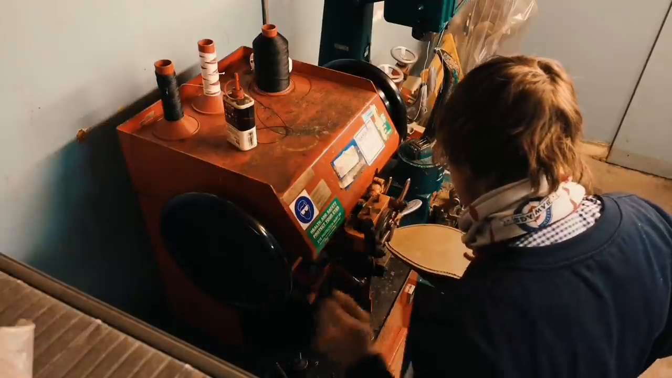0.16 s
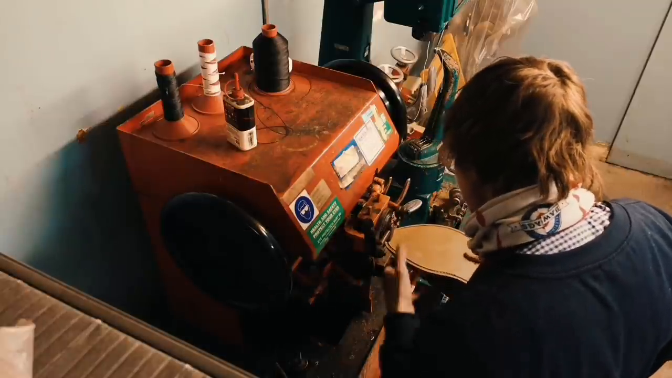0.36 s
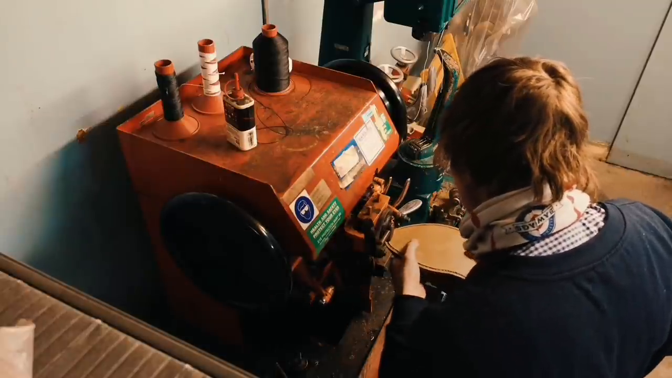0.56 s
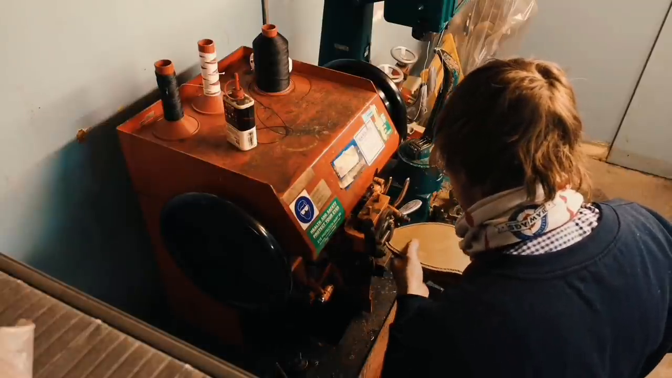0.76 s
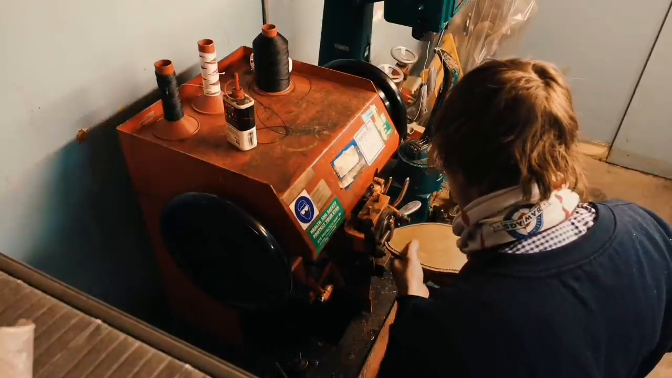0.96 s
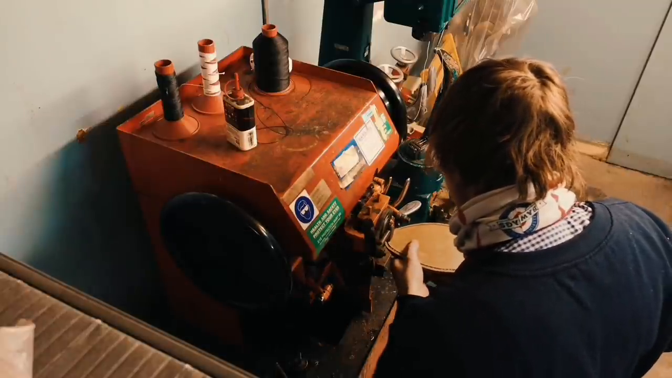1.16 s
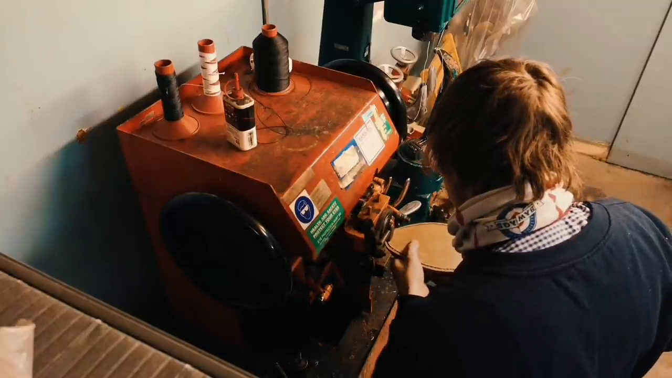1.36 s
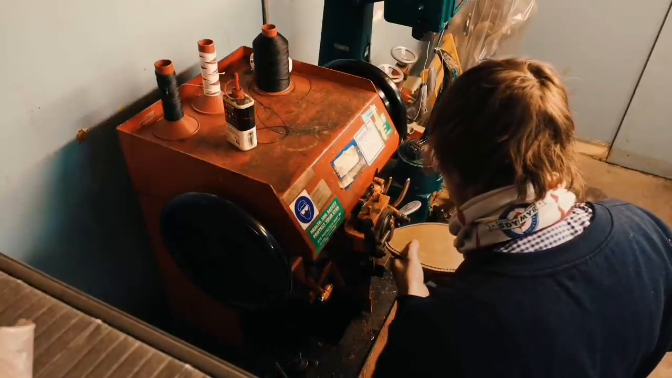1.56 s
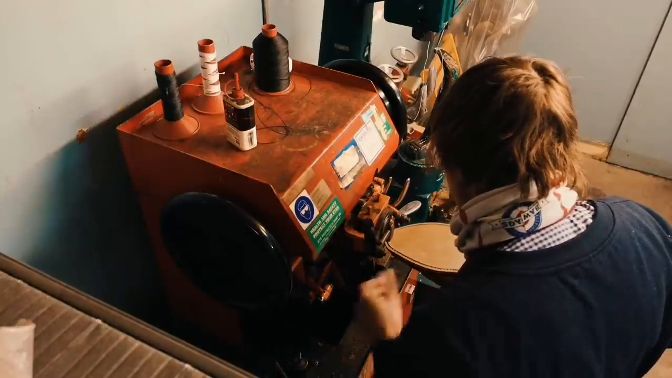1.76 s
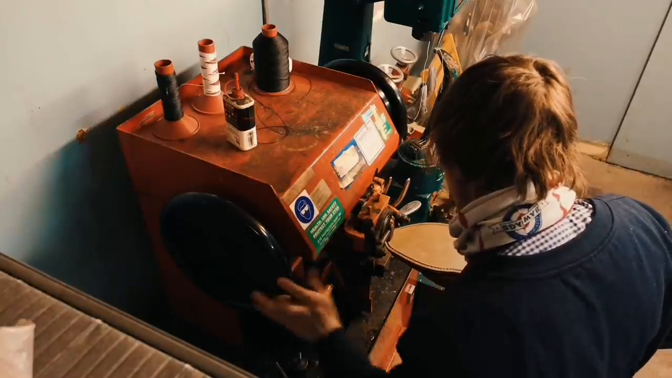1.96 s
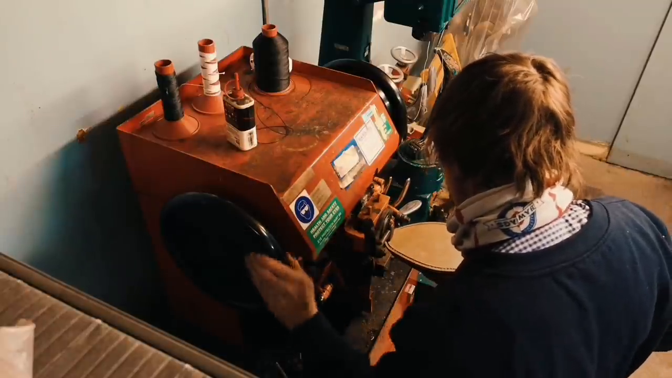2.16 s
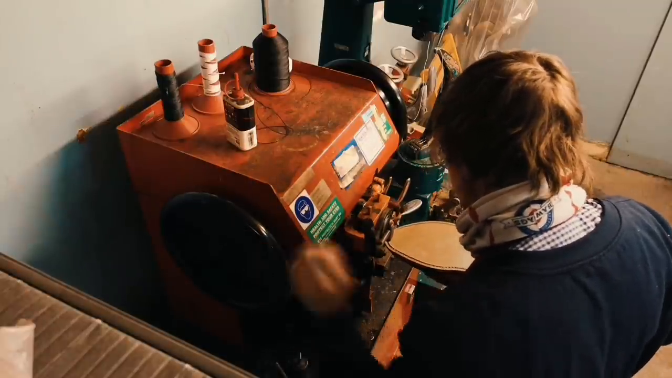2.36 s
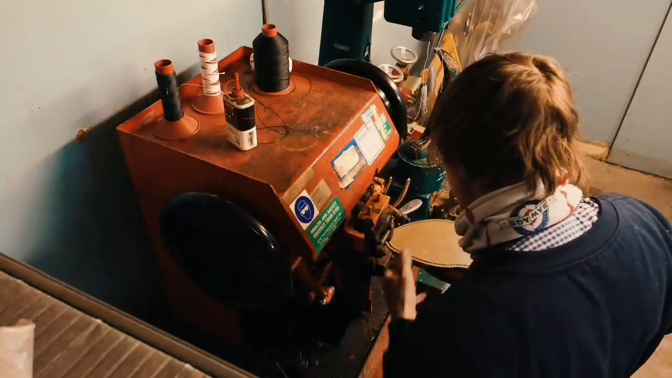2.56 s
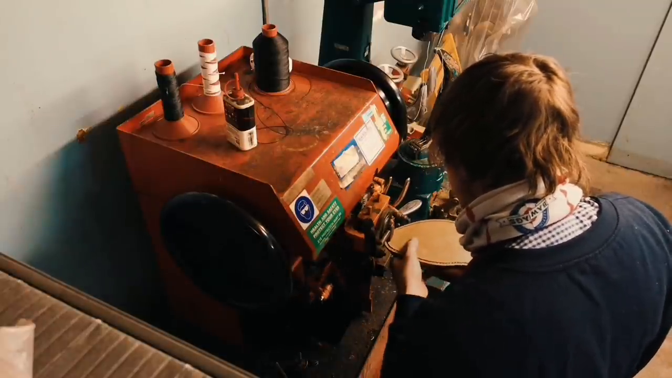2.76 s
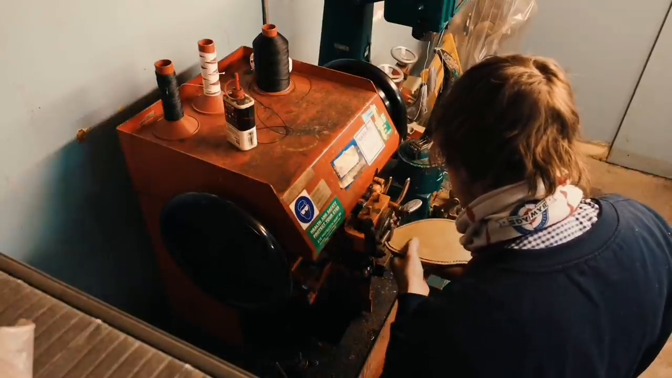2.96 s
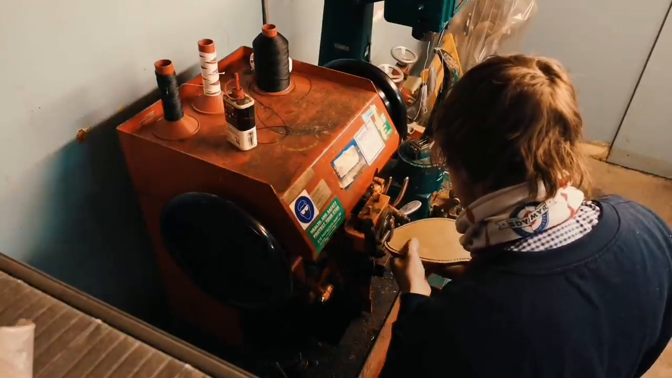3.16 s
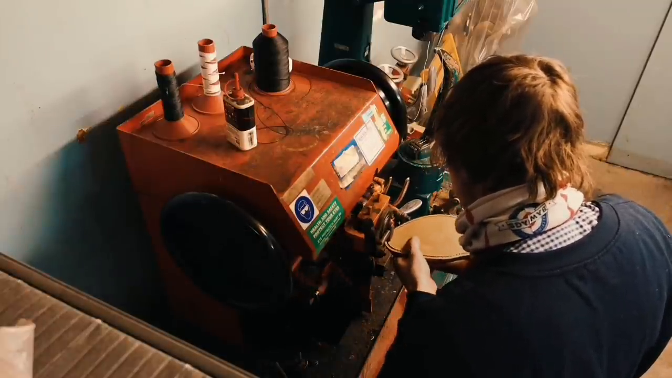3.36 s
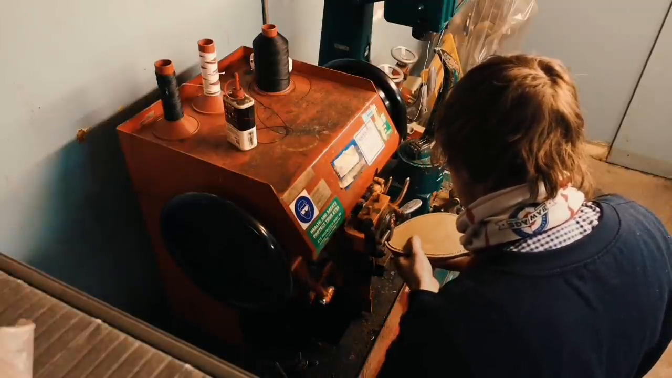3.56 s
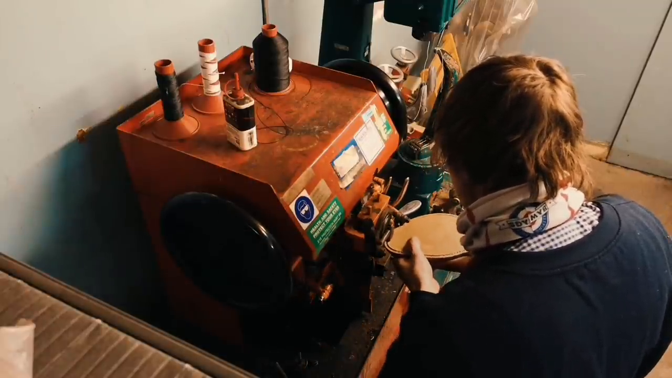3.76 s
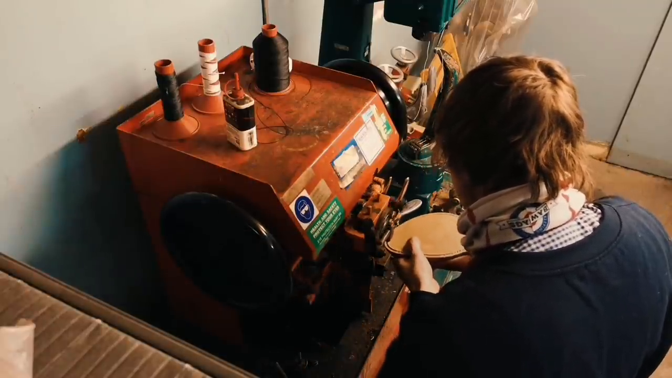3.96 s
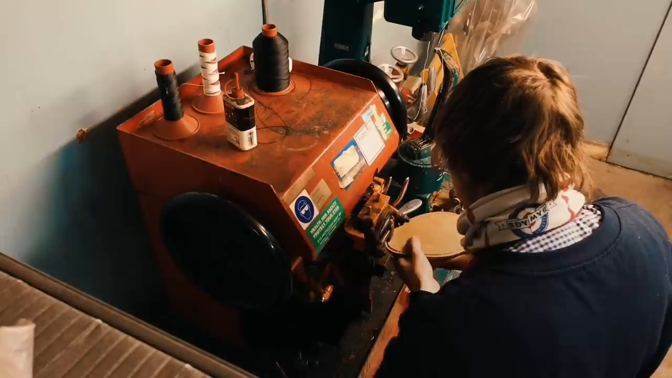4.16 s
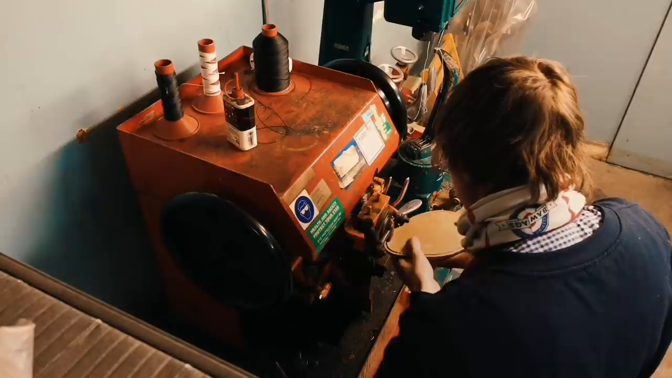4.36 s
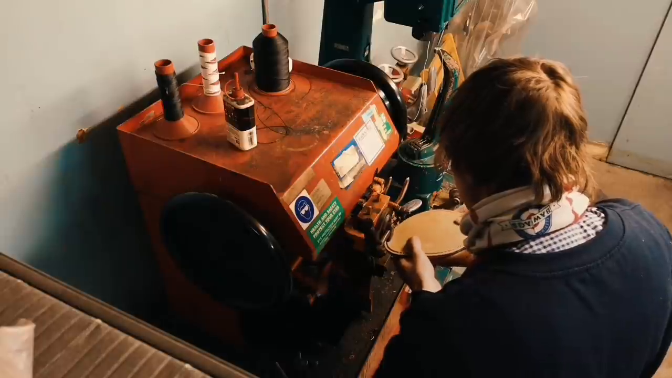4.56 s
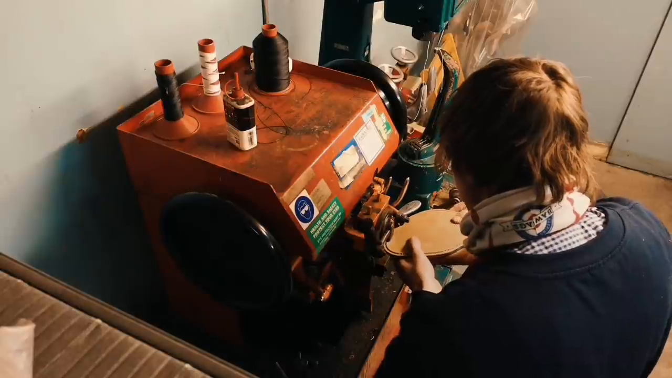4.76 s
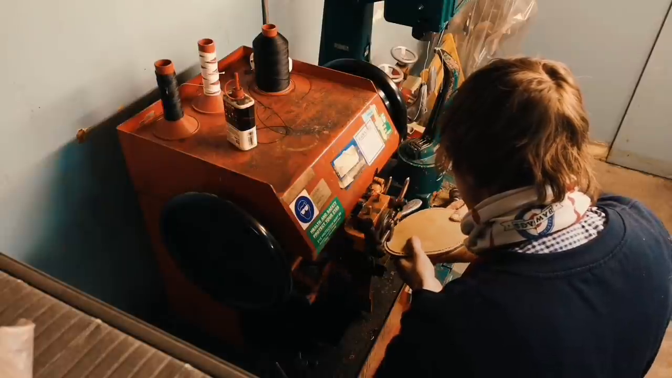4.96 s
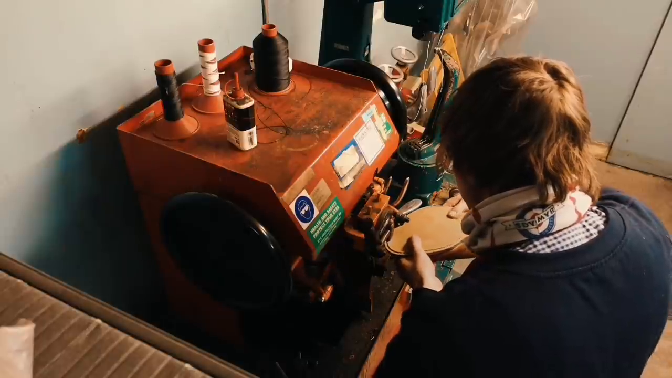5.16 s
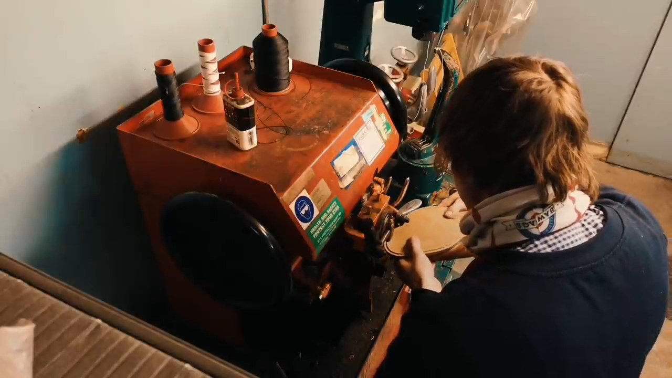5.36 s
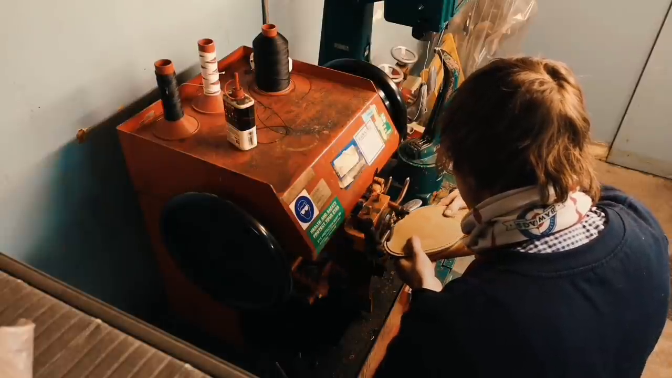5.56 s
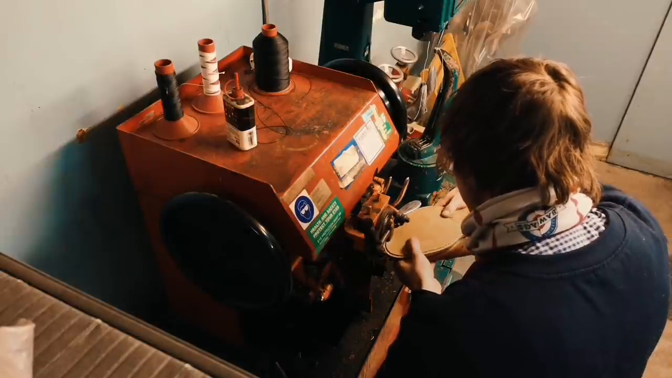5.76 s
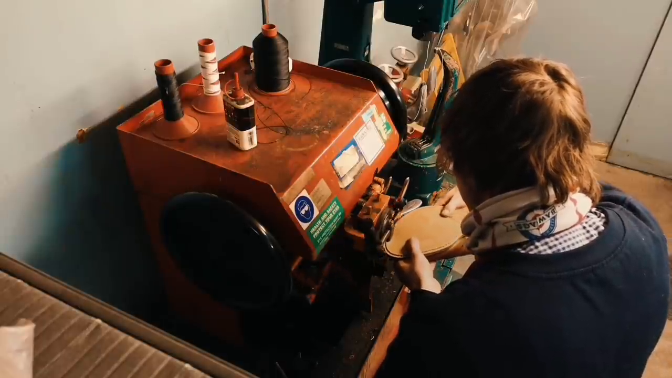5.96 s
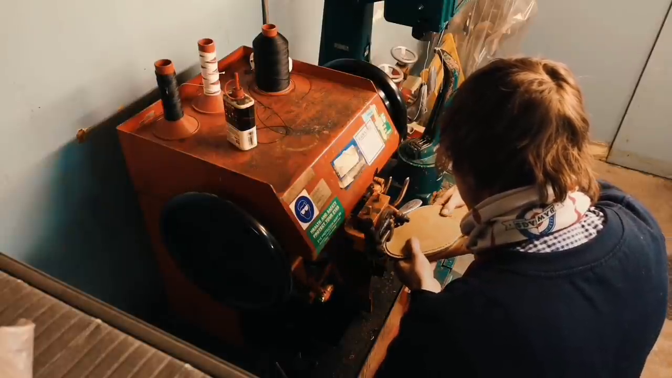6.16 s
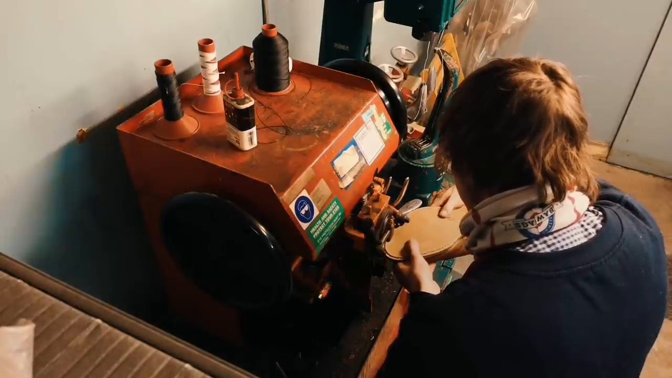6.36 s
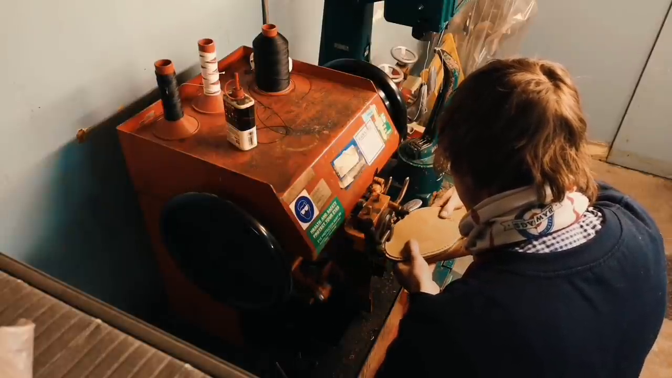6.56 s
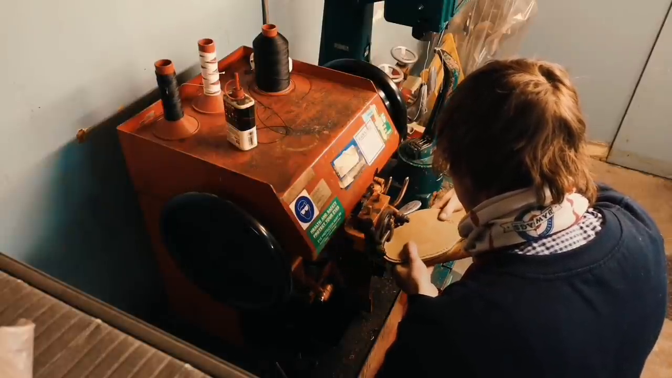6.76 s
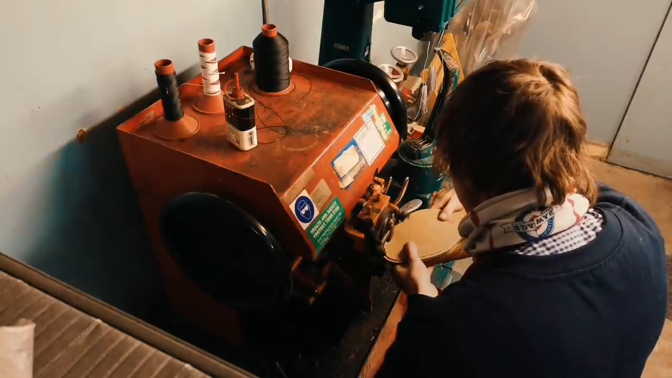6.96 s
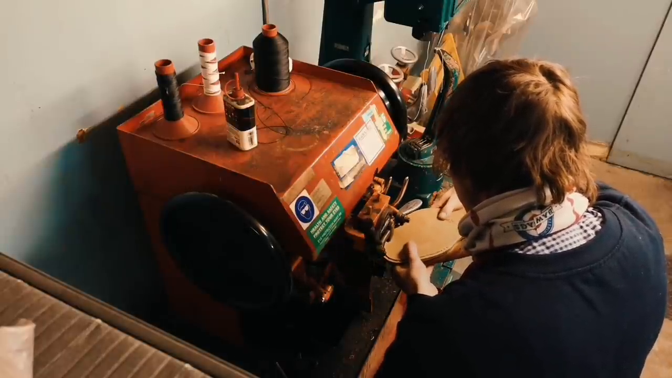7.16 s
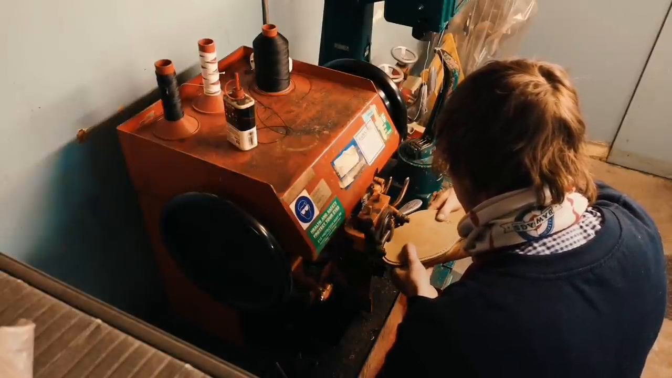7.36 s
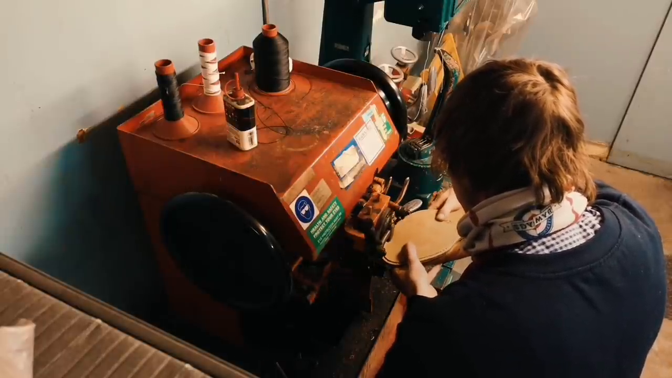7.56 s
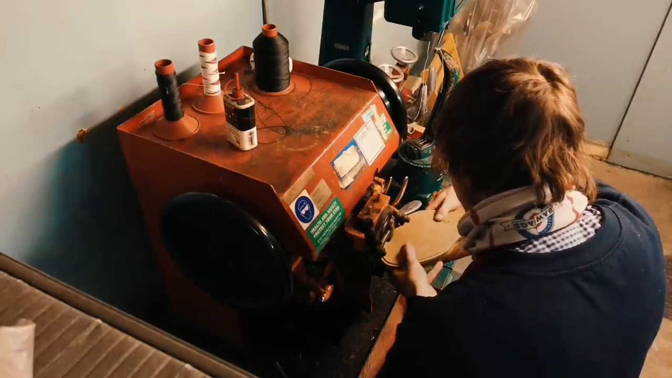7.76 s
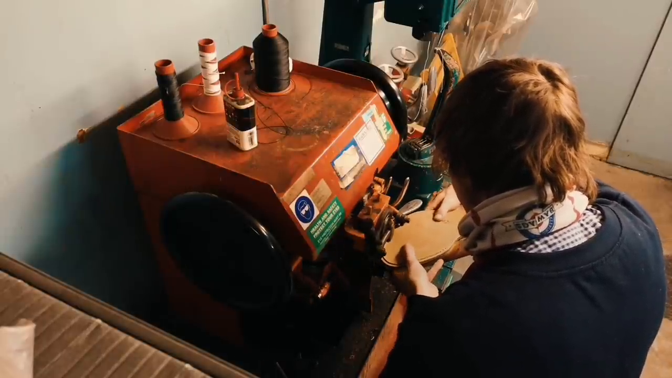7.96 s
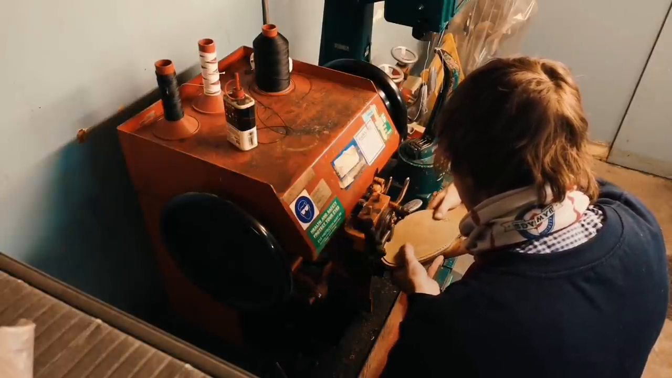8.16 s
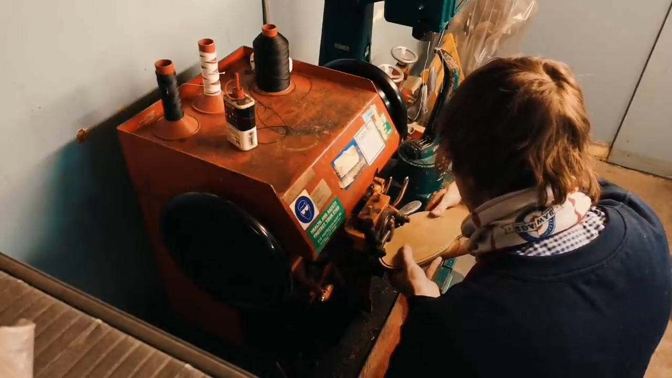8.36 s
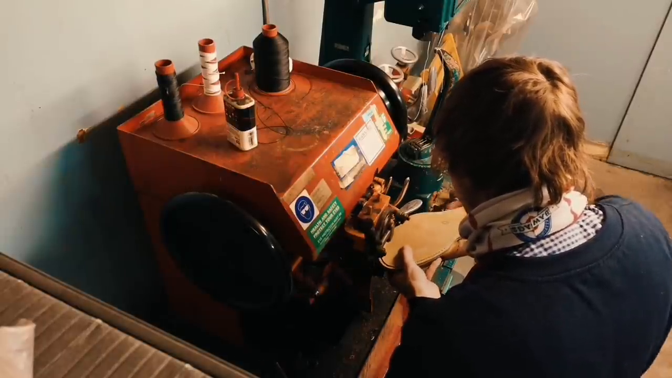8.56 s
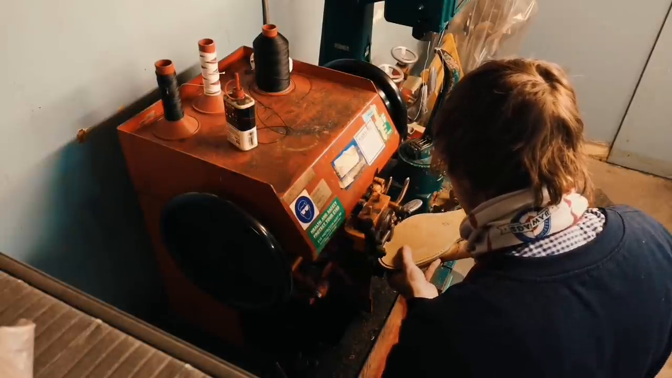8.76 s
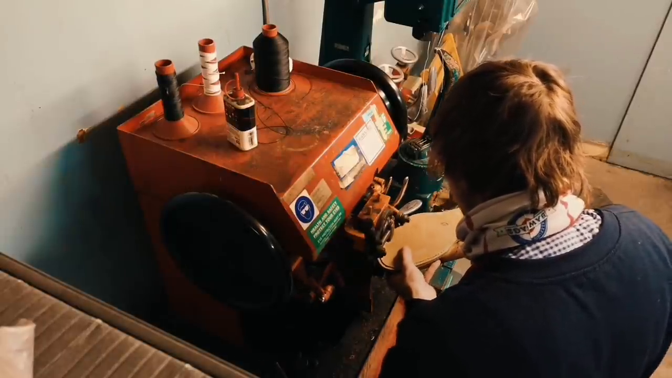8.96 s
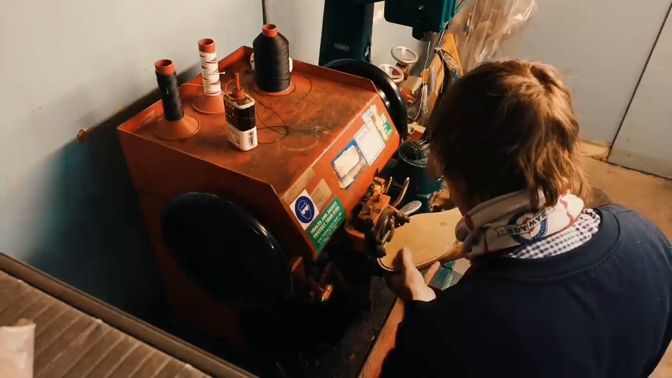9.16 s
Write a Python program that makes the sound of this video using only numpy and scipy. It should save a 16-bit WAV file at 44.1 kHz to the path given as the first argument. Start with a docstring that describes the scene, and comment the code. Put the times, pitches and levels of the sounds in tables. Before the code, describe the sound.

A sole stitching machine is turned slowly by hand, giving irregular metal knocks and low booms from its sheet-metal cabinet. It falls nearly silent, with two soft hollow taps over a faint motor hum. Then it runs under power at about two stitches a second, each a cluster of clanks, snaps and clicks, with loose parts rattling and the cabinet drumming beneath. The sound is close and fairly dry, in a quiet workshop.

```python
"""A sole stitching machine in a sheet-metal cabinet. First it is turned slowly by hand: cams and levers
knock, exciting the modes of the steel head, and the cabinet booms. In a pause two hollow taps sound over
the faint hum of a motor. From 2.5 s it runs at two stitches a second: in each the awl drops, the hook
clanks, the feed snaps over, a lever falls and the take-up pulls the thread tight, while loose parts
rattle and the panels, driven through the frame, drum along."""
import sys
import numpy as np
from scipy import signal
from scipy.io import wavfile
from scipy.ndimage import uniform_filter1d

SR = 44100
rng = np.random.default_rng(int(sys.argv[2]) if len(sys.argv) > 2 else 0)


def inscribe(sig):
    """Save sig as 16-bit PCM at rate SR to the path in sys.argv[1].

    A 1-D sig is mono; a 2-D sig holds one channel per row.
    Samples are clipped to [-1, 1] before scaling.
    """
    pcm = np.round(np.clip(np.atleast_2d(sig).T, -1, 1) * 32767)
    wavfile.write(sys.argv[1], SR, pcm.astype(np.int16))


N = 405719

# one row a stitch: t/s, level/dB, push on the cabinet/dB
AWL_DROPS = [(2.533, -33, -10), (3.0924, -29, -8), (3.5905, -29.5, -10), (4.1214, -29.5, -9),
             (4.644, -29.5, -11), (5.141, -28.5, -7.5), (5.652, -30, -2), (6.141, -29.5, -8),
             (6.6478, -29.5, 0.5), (7.1474, -29, -1), (7.657, -30, -4), (8.208, -33.5, -4),
             (8.769, -33.5, -5)]
FEED_SNAPS = [(2.746, -25.5, -16), (3.32, -29, 1), (3.7874, -31, -2), (4.3207, -26, -2),
              (4.8517, -34.5, -4), (5.3308, -23, -10), (5.8526, -32.5, -2), (6.329, -24, 1),
              (6.8401, -31.5, 4), (7.358, -27.5, -1), (7.8536, -27.5, -1.5), (8.4144, -26.5, -1.5),
              (9.0121, -25, -6)]
TAKE_UP_PULLS = [(2.956, -37, -5), (3.455, -39.5, -18), (3.9812, -25.5, -18), (4.487, -35, -9),
                 (5.0096, -31, -5), (5.5144, -31.5, -12.5), (6.013, -30, -5), (6.5147, -28.5, -12),
                 (7.0137, -30.5, -12), (7.5282, -28.5, -6), (8.058, -28, -18), (8.6223, -29.5, -18),
                 (9.1836, -51, -5.5)]
# the hook, once a stitch: t/s, ring level/dB, knock level/dB, extra rattle of the stitch/dB
HOOK_CLANKS = [(2.611, -26.5, -33, -0.5), (3.1568, -33, -28.5, 0), (3.659, -37, -31.5, -0.5),
               (4.1923, -35.5, -31.5, 0), (4.7123, -32, -29.5, 0.5), (5.2076, -52, -30, 0),
               (5.7174, -29, -28, 0), (6.208, -30, -28.5, 0.5), (6.7118, -31.5, -28.5, 0),
               (7.218, -29, -30, 0), (7.7283, -40, -27.5, -1), (8.283, -28.5, -31, -0.5),
               (8.851, -29, -31.5, -6.5)]
LEVER_FALLS = [(2.874, -36.5), (3.3765, -31.5), (3.8961, -32.5), (4.434, -37), (4.933, -32.5),
               (5.4348, -33.5), (5.9331, -35.5), (6.4306, -33), (6.9323, -32), (7.442, -32.5),
               (7.9619, -40), (8.5262, -36), (9.109, -37.5)]   # t/s, level/dB
HEAD_SPECTRUM = [(300, -25), (420, -0.5), (900, -1.5), (1260, -8), (1750, -2.5), (2100, 2.5), (2700, -2),
                 (3600, -5.5), (5500, -8.5), (7600, 0), (8400, -16), (9700, -9), (11000, -28), (13200, -20),
                 (15500, -19)]   # broadband sound of the head: f/Hz, spectral density/dB
RIGHT_LAG = [(800, 21), (1200, 3)]   # later arrival at the right port: f/Hz, delay/samples


def knocks():
    """Impacts of a cam mechanism recur with shaft angle; rows of t/s, level/dB, dull/dB, middle/dB."""
    colours = [(-15.5, -14.5), (-16.5, -4), (-18.5, -6), (-6, -15), (-13, -13)]   # awl, hook, feed, lever, take-up: dull part/dB, middle part/dB
    # awl and take-up touch twice: delay/s, relative level/dB, dull part/dB, middle part/dB
    second_touch = [(0.0195, -8, -0.5, -10.5), (0.0069, 6, -18.5, -13)]
    cams = [(0.18, -29.5, -34.5, 3.5), (0.255, -34, -8.5, -14.5), (0.485, -36.5, -15.5, -5.5)]   # lesser cams: angle/turns, level/dB, dull part/dB, middle part/dB
    stray = [(0.1, -54, -17, -11), (0.152, -44.5, -14, -10), (0.175, -40.5, -13, -15),
             (0.236, -34, -11, -22), (0.344, -32, -12.5, -12), (0.357, -35.5, -24, 8),
             (0.414, -33.5, -13, -11), (0.557, -42, -12, -19), (0.596, -37.5, -9, -9.5),
             (0.612, -29, -11, -7), (0.754, -36, -24, -9), (0.7776, -46.5, -1.5, -5.5),
             (0.8054, -41, -7.5, -13.5), (0.945, -46.5, -1, -26), (0.958, -38.5, -9, -23),
             (1.198, -41.5, -19.5, -17), (1.268, -46, -12, -7), (1.2891, -39, -5.5, -17.5),
             (2.4366, -48.5, -20.5, -8), (2.4861, -29, -20.5, -16), (4.612, -27.5, -23, -15),
             (8.879, -35, -11, -6.5), (8.897, -36.5, -5, -10), (9.077, -37.5, -10, -3),
             (6.256, -27, -25, -1), (6.772, -32, -8.5, -11)]   # irregular knocks: t/s, level/dB, dull part/dB, middle part/dB
    hooks = [(s, db) for s, _, db, _ in HOOK_CLANKS]
    parts = AWL_DROPS, hooks, FEED_SNAPS, LEVER_FALLS, TAKE_UP_PULLS
    main = [(*row[:2], *colour) for rows, colour in zip(parts, colours) for row in rows]
    for rows, (lag, more_db, *colour) in zip((AWL_DROPS, TAKE_UP_PULLS), second_touch):
        main += [(s + lag, db + more_db, *colour) for s, db, _ in rows]
    times, turns = shaft_angles()
    scatter_db = 1.5 * rng.standard_normal((len(AWL_DROPS), len(cams)))
    lesser = [(np.interp(k + at, turns, times), db + HOOK_CLANKS[k][3] + scatter_db[k, j], *colour)
              for k in range(len(AWL_DROPS)) for j, (at, db, *colour) in enumerate(cams)]
    return np.array(main + lesser + stray)


def shaft_angles():
    """One shaft phase-locks the five main contacts of each stitch; returns their t/s and angle/turns."""
    parts = AWL_DROPS, HOOK_CLANKS, FEED_SNAPS, LEVER_FALLS, TAKE_UP_PULLS
    phases = np.array([0, .13, .39, .57, .74])
    times = np.transpose([np.transpose(rows)[0] for rows in parts])
    turns = np.arange(len(times))[:, None] + phases
    return times.ravel(), turns.ravel()


def excitation():
    """Boom, panel and rattle levels/dB: irregular by hand, then periodic forcing by the driven shaft."""
    by_hand = [(0.0, -26, -58, -70), (0.102, -58, -68, -77.5), (0.24, -31, -47, -56.5),
               (0.34, -46.5, -47, -55.5), (0.43, -37.5, -46, -50), (0.56, -38.5, -48.5, -62.5),
               (0.78, -36, -49, -61.5), (0.873, -24.5, -50.5, -71.5), (0.999, -33, -47.5, -63.5),
               (1.071, -33, -66, -73.5), (1.3, -41.5, -51, -66.5), (1.51, -42.5, -65, -72.5),
               (1.66, -68, -76, -84), (2.0, -74, -76, -75), (2.3, -54, -64.5, -73.5),
               (2.4, -64.5, -69, -77), (2.469, -38, -59.5, -63.5), (2.531, -30, -46, -51)]   # slow turns and pause: t/s, boom/dB, panels/dB, rattle/dB
    one_turn = [(0.0, -19, -47, -56.5), (0.05, -34, -34.5, -58.5), (0.13, -23, -35.5, -48),
                (0.211, -20, -35.5, -39.5), (0.288, -22.5, -31, -43), (0.37, -35, -34, -44),
                (0.46, -24, -36, -44.5), (0.57, -14, -33, -44.5), (0.67, -13.5, -35.5, -49),
                (0.76, -28, -35, -44.5), (0.88, -17, -40, -52), (0.97, -26, -44.5, -54)]   # under power: angle/turns, boom/dB, panels/dB, rattle/dB
    drive_start_s, panel_coupling = 2.53, 0.4
    t = np.arange(N) / SR
    angle = np.interp(t, *shaft_angles())
    phase, *columns = np.transpose(one_turn)
    boom_db, panel_db, rattle_db = (np.interp(angle, phase, c, period=1) for c in columns)
    push_db, = in_time(sorted((s, db) for s, _, db in AWL_DROPS + FEED_SNAPS + TAKE_UP_PULLS))
    stitch_db = np.transpose(HOOK_CLANKS)[3][angle.astype(int)]
    driven = boom_db + push_db, panel_db - 5 + panel_coupling * stitch_db, rattle_db + stitch_db
    return [uniform_filter1d(np.where(t < drive_start_s, hand, drive), size=300)
            for hand, drive in zip(in_time(by_hand), driven)]


def knock_db(impacts, hz):
    """Impact spectrum: each knock's level at one frequency, with two broad humps and both ends thinned."""
    _, level_db, dull_db, middle_db = impacts.T
    dull = np.exp(-(np.log2(hz / 2200) / 1.89) ** 2)
    middle = np.exp(-(np.log2(hz / 4900) / 0.84) ** 2)
    thin_db = -6.5 * np.clip(np.log2(1400 / hz), 0, 1) - 6 * np.clip(np.log2(hz / 8500), 0, 1)
    return level_db + thin_db + dull * (dull_db + 9) + middle * (middle_db + 12.5)


def clatter(impacts, rattle_db):
    """Incoherent sounds add in power: each knock's short crack and longer tail, and the rattle, as noise."""
    tail_decay = [(600, 0.35), (2200, 0.25), (6000, 0.24), (13000, 0.11)]   # f/Hz, T60/s
    crack_t60, crack_db, tail_db = 0.033, 1, -2
    common_drift, scatter = drift(31), rng.standard_normal((len(impacts), 40))

    def envelope(hz):
        scatter_db = 4.4 * np.tanh(scatter[:, int(3 * np.log2(hz)) % 40])
        strength = from_db(knock_db(impacts, hz) - 7 + scatter_db)
        swell = np.exp(-np.minimum(hz, 4500) / (11 * SR))   # lows take longer to build
        power = signal.lfilter([1 - swell], [1, -swell], spikes(impacts[:, 0], strength ** 2))
        knock_power = sum(from_db(2 * db) * signal.lfilter([1], [1, -decay(t60) ** 2], power)
                          for t60, db in ((at_hz(tail_decay, hz), tail_db), (crack_t60, crack_db)))
        dark_db = -3 * np.clip(np.log2(hz / 8500), 0, 1)
        rattle = from_db(rattle_db - 3 + dark_db + 0.48 * common_drift + 5.5 * np.tanh(drift(17)))
        return np.sqrt(knock_power + rattle ** 2)
    return noise_bands(388.4, HEAD_SPECTRUM, envelope)


def head_rings(impacts, rattle_db):
    """Modal response of the head: knocks and two bounces excite all modes, loose parts one at a time."""
    modes = [(805, -21.5, 0.043), (910, -15, 0.056), (1147, -17.5, 0.055), (1332, -20.5, 0.05),
             (1485, -13.5, 0.04), (1826, -10, 0.043), (2037, -12.5, 0.05), (2174, -5, 0.012),
             (2370, -5.5, 0.017), (2680, -6, 0.031), (3160, -14, 0.025), (4030, -24, 0.02),
             (4335, -9, 0.017), (4680, -19, 0.015), (5234, -13.5, 0.028), (5473, -9, 0.025),
             (5740, -12, 0.03), (5960, -17, 0.046), (6800, -7, 0.022), (7180, -9.5, 0.017),
             (7544, -2.5, 0.025), (7800, -13.5, 0.023)]   # f/Hz, level/dB, T60/s
    clicks_per_s = 260
    onsets = impacts[:, 0]
    bounces = onsets + np.cumsum(rng.uniform(0.0028, .011, (len(onsets), 2)), axis=1).T
    out = 0
    for hz, mode_db, t60 in modes:
        loose = np.flatnonzero((rng.random(N) < clicks_per_s / SR) & (rattle_db > -66))   # none at rest
        click_db = rattle_db[loose] - 4.5 + 3.5 * np.minimum(rng.exponential(1, len(loose)), 3)
        blow_db = knock_db(impacts, hz) - 7
        times = np.concatenate([onsets, *bounces, loose / SR])
        heights = from_db(np.concatenate([blow_db, blow_db - 5.5, blow_db - 0.5, click_db]))
        uneven = from_db(6.5 * np.tanh(rng.standard_normal((2, len(times)))))
        polarity = rng.choice([-1, 1], uneven.shape)
        pair = [spikes(times, heights * side) for side in uneven * polarity]
        out = out + from_db(mode_db) * ports(bandpass(ring(pair, hz, t60), hz / 1.11, hz * 1.15), hz)
    return out


def jingle(rattle_db):
    """Random impacts: 36 small loose parts click independently, each ringing at its natural frequency."""
    clicks_per_s, t60 = 14, 0.046
    moving = rattle_db[:N // 8 * 8:8] > -70
    out = 0
    for hz in np.geomspace(1500, 14500, num=36) * rng.uniform(.97, 1.03, size=36):
        at = np.flatnonzero((rng.random(N // 8) < clicks_per_s * 8 / SR) & moving) * 8
        scatter_db = 4 * np.tanh(rng.standard_normal((2, len(at))))
        click_db = rattle_db[at] - 2 + at_hz(HEAD_SPECTRUM, hz) + scatter_db
        pair = [spikes(at / SR, from_db(side)) for side in click_db]
        out = out + ports(bandpass(ring(pair, hz, t60), hz / 1.04, hz * 1.04), hz)
    return out


def hook():
    """Free vibration after impact: the cam snaps dully and the hook rings bright just after it."""
    touches = [(0.3438, -37), (0.609, -37), (0.9796, -47), (0.995, -55), (4.326, -32), (5.329, -40),
               (5.446, -36), (7.857, -36), (8.416, -40)]   # lighter contacts: t/s, level/dB
    hook_modes = [(4385, 0, 0.037), (5240, -6, 0.03), (7400, -13, 0.03)]   # f/Hz, level/dB, T60/s
    cam_modes = [(1830, -10, 0.03), (2200, -5, 0.03), (2650, -7, 0.035), (3100, -12, 0.015)]   # f/Hz, level/dB, T60/s
    clanks = touches + [(s + 0.0035, db) for s, db, _, _ in HOOK_CLANKS]
    snaps = [(s, db) for s, _, db, _ in HOOK_CLANKS]
    return struck(clanks, hook_modes, left_db=4) + struck(snaps, cam_modes, left_db=5)


def small_parts():
    """Natural frequencies tell struck parts apart: dull lever, stiff pin, cover plate, thin guide, link."""
    # blows: t/s, level/dB
    pin_blows = [(3.793, -50), (4.327, -44), (4.4, -55), (5.336, -42), (6.334, -48.5), (6.402, -49),
                 (7.355, -48), (8.422, -51), (9.024, -50)]
    plate_blows = [(3.723, -33), (4.253, -37), (5.78, -34.5), (6.785, -41), (7.356, -36), (8.346, -32),
                   (8.372, -33)]
    guide_blows = [(2.534, -47), (2.6375, -45), (3.0915, -40.5), (3.157, -42), (3.5918, -39), (3.6596, -39),
                   (4.1238, -35), (4.3217, -36), (4.647, -35.5), (4.7138, -31), (5.1428, -38),
                   (5.2074, -34), (5.3299, -34), (5.6532, -37), (5.7195, -45), (6.144, -38.5),
                   (6.2383, -27.5), (6.3306, -38), (6.378, -31.5), (6.6486, -42), (6.7153, -39),
                   (7.7555, -32), (8.2822, -51), (8.8494, -36)]
    link_blows = [(2.6106, -40), (2.7438, -48), (2.8086, -34), (3.1573, -34), (3.6627, -33), (4.193, -30.5),
                  (4.4344, -36), (4.7123, -34), (4.851, -34), (5.2092, -32), (5.27, -35), (5.3299, -28),
                  (5.7195, -38.5), (6.2124, -43), (6.3286, -28), (6.7172, -46), (7.2201, -33),
                  (7.3583, -33), (7.7289, -32), (7.8532, -33), (8.2857, -37), (8.4827, -35), (8.8499, -34),
                  (9.012, -49)]
    # modes: f/Hz, level/dB, T60/s
    lever_modes = [(2330, -2, 0.028), (2560, -3, 0.028), (2950, -9, 0.02)]
    pin_modes = [(12930, 5, 0.03), (13170, -8, 0.04)]
    plate_modes = [(1822, -1, 0.055)]
    guide_modes = [(6775, 1.5, 0.045)]
    link_modes = [(5380, -9, 0.03), (5520, -5, 0.04), (5750, -6.5, 0.045), (6096, -10, 0.04)]
    lever_blows = [(s, db + 5) for s, db in LEVER_FALLS]
    return (struck(lever_blows, lever_modes, left_db=9, lag_samples=6)
            + struck(pin_blows, pin_modes, left_db=3, scatter_db=1)
            + struck(plate_blows, plate_modes, left_db=1, scatter_db=1, lag_samples=3)
            + struck(guide_blows, guide_modes, left_db=9, lag_samples=0)
            + struck(link_blows, link_modes, left_db=11, scatter_db=2.5))


def cabinet_boom(level_db):
    """The cabinet's lowest mode: each thump restarts it in antiphase, while the stand shudders."""
    thumps = [(2.405, -50, 65.46), (2.504, -25, 69.9), (2.605, -27.5, 73.2), (2.7, -20.5, 76.17),
              (2.778, -19.5, 74.4), (2.866, -18, 72.35), (3.042, -30.5, 64.97), (3.087, -20.5, 71.44),
              (3.205, -19, 72.69), (3.354, -25.5, 71.6), (3.39, -16.5, 67.98), (3.47, -19.5, 71.92),
              (3.592, -22, 71.83), (3.728, -22, 69.24), (3.896, -22.5, 63.26), (4.005, -33.5, 66.1),
              (4.042, -26, 64.57), (4.102, -25, 72), (4.191, -30, 83.95), (4.249, -20.5, 73.7),
              (4.4, -21, 70.9), (4.522, -25.5, 70.9), (4.583, -24, 73.67), (4.717, -46, 70.4),
              (4.755, -24.5, 75.7), (4.791, -19, 72.5), (4.908, -30, 73.3), (4.942, -19, 67.43),
              (5.024, -22.5, 75.52), (5.139, -26.5, 73.63), (5.254, -22, 72.48), (5.4, -23.5, 72.4),
              (5.445, -18.5, 65.57), (5.506, -20.5, 71.9), (5.644, -21.5, 71.35), (5.766, -18.5, 71.66),
              (5.952, -17, 67.6), (6.037, -24, 70.56), (6.251, -20, 71.77), (6.408, -24, 80.2),
              (6.442, -19, 69.47), (6.578, -25, 70.36), (6.76, -19.5, 70.7), (6.901, -18.5, 68.5),
              (6.938, -18, 66.8), (7.03, -22, 71), (7.08, -22.5, 74.5), (7.144, -21.5, 71.76),
              (7.266, -20, 71.76), (7.456, -21.5, 63.1), (7.524, -31, 63.6), (7.585, -24.5, 69.9),
              (7.651, -23.5, 71.57), (7.779, -20, 71.6), (7.971, -23, 70.3), (8.066, -29, 68.2),
              (8.117, -23, 69.74), (8.332, -26, 81.7), (8.372, -21.5, 74.46), (8.495, -23.5, 74.8),
              (8.529, -21, 69.46), (8.668, -23.5, 70.6), (8.864, -24, 70.7), (9.007, -22, 76.4),
              (9.064, -28, 76), (9.11, -23.5, 70.6), (9.164, -17, 64.7)]   # thumps of the frame: t/s, level/dB, f/Hz
    hand_pitch = [(0.0, 79.66), (0.41, 64.71), (0.51, 75.88), (1.41, 69.1), (1.84, 80.63), (2.12, 66.54),
                  (2.43, 78.08)]   # the mode on the slow turns: t/s, f/Hz
    skew, fullness = 0.91, 0.6   # under 1: each arch of sound peaks early and is flat
    onsets, thump_db, thump_hz = np.transpose(thumps)
    t = np.arange(N) / SR
    by_hand = t < onsets[0]
    progress = np.interp(t, [*onsets, N / SR], np.arange(len(onsets) + 1))
    k = np.minimum(progress.astype(int), len(onsets) - 1)
    arch = np.abs(np.sin(np.pi * (progress - k) ** skew)) ** fullness
    driven = (-1) ** k * from_db(thump_db[k] - 1.33) * arch
    amplitude = np.where(by_hand, np.sqrt(2) * from_db(level_db), driven) * from_db(1.31 * drift(18))
    hand_hz, = in_time(hand_pitch)
    hz = uniform_filter1d(np.where(by_hand, hand_hz, thump_hz[k]), size=600) + 1.52 * drift(17)
    swing = uniform_filter1d(amplitude, size=300) * np.sin(2 * np.pi * np.cumsum(hz) / SR)
    white = rng.standard_normal((2, N))
    stand_db = uniform_filter1d(level_db, size=8000) - 10
    stand = unit_rms(ring(ring(white, 59, 0.34), 46.7, 0.13)) * from_db(stand_db)
    shudder = unit_rms(ring(ring(white, 91.7, 0.33), 115, 0.042)) * from_db(level_db - 16.5)
    return ports(swing * [[1], [0]] + stand + shudder, hz=69.5)


def panel_drumming(level_db):
    """Structure-borne excitation: soft random blows through the frame keep the panel modes sounding."""
    modes = [(147.8, 37.5, -1), (173.7, 10.4, -3.5), (201, 38.6, -5), (296.8, 52, -9), (363, 36, -15.5),
             (413.2, 43, -15.5)]   # f/Hz, bandwidth/Hz, level/dB
    blows_per_s = 420
    blows = (rng.random((2, N)) < blows_per_s / SR) * rng.standard_normal((2, N)) + 1e-18
    out = 0
    for k, (hz, width_hz, mode_db) in enumerate(modes):
        t60 = np.log(1000) / (np.pi * width_hz)
        mode = ring(ring(blows, hz, t60), hz, t60 / 1.5)
        out = out + (-1) ** k * from_db(mode_db) * ports(unit_rms(mode), hz)
    return from_db(level_db) * unit_rms(out)


def panel_knocks():
    """Damped oscillation: each hard knock on a panel swells briefly and decays at its own frequency."""
    blows = [(0.27, -36.5, 159.7), (0.412, -40.5, 155), (0.462, -37, 163), (0.517, -38, 185),
             (0.675, -37.5, 162.5), (2.564, -36, 168), (2.691, -28, 163.5), (2.765, -26.5, 153),
             (2.843, -31.5, 158), (3.224, -28.5, 154), (3.349, -32.5, 160), (3.4, -30.5, 151),
             (3.72, -25.5, 167), (3.77, -32, 168), (3.817, -33.5, 172), (3.886, -27.5, 168.5),
             (4.255, -29.5, 155), (4.307, -30, 179), (4.454, -34, 153), (4.781, -28, 150),
             (4.929, -32.5, 164), (5.276, -27.5, 155), (5.778, -27, 156), (5.919, -30, 153),
             (6.23, -33.5, 177), (6.276, -26, 150), (6.383, -39.5, 167.8), (6.445, -35, 165),
             (6.78, -26, 158), (6.913, -27, 161), (7.288, -26.5, 149), (7.413, -34.5, 160),
             (7.793, -25, 149), (8.359, -27.5, 161), (8.399, -32, 166), (8.631, -36, 158),
             (8.899, -32.5, 167), (9.118, -30.5, 163)]   # t/s, peak level/dB, f/Hz
    rise_s, t60 = 0.008, 0.11
    t, out = np.arange(SR // 4) / SR, np.zeros(N + SR)
    shape = (1 - np.exp(-t / rise_s)) * from_db(-60 * t / t60)
    for s, peak_db, hz in blows:
        i = int(s * SR)
        out[i:i + len(t)] += from_db(peak_db) * shape / shape.max() * np.sin(2 * np.pi * hz * t)
    return np.array([out[:N], np.roll(out, int(at_hz(RIGHT_LAG, 160)))[:N]])


def hollow_taps():
    """Two taps in the pause: a click, and a hollow body whose closely spaced modes beat."""
    taps = [(2.103, -58), (2.244, -64)]   # t/s, level/dB
    click_modes = [(2380, -2, 0.018), (3680, -3, 0.018), (2800, -14, 0.02), (4050, -14, 0.015)]   # f/Hz, level/dB, T60/s
    body_modes = [(630, -12, 0.2), (655, -8, 0.19), (684, -13, 0.2)]   # f/Hz, level/dB, T60/s
    # a touch, then the full weight
    contacts = [(s + lag, db + more_db) for s, db in taps for lag, more_db in ((0, -10), (.016, 1))]
    click = struck(taps, click_modes, left_db=5, scatter_db=1)
    return click + struck(contacts, body_modes, left_db=13, scatter_db=2)


def motor_hum():
    """An idling motor gives a line spectrum, each partial wandering in level and phase."""
    partials = [(102, -62), (145, -79), (700, -90), (850, -91)]   # f/Hz, level/dB
    t = np.arange(N) / SR
    return sum(from_db(db + 3 + 3.2 * drift(4.4)) * np.sin(2 * np.pi * hz * t + 0.59 * drift(6))
               for hz, db in partials)


def workshop_air():
    """The ambient noise floor: stationary and strongest in the deep bass."""
    spectrum = [(15, -43), (25, 1), (101, -17.5), (131, -25.5), (462, -32.5), (691, -36), (840, -31.5),
                (1220, -42), (2000, -31.5), (2600, -36), (3300, -71), (4400, -53), (7090, -37),
                (10900, -75), (15000, -62)]   # f/Hz, spectral density/dB
    return from_db(-64) * noise_bands(26.4, spectrum, lambda hz: 1)


def struck(blows, modes, left_db, scatter_db=1.5, lag_samples=1):
    """Modal superposition: blows (t/s, level/dB) ring one part; a narrow band makes each mode swell."""
    swell_band_hz = 252
    times, level_db = np.transpose(blows)
    out, scatter = 0, scatter_db * rng.standard_normal((len(times), len(modes)))
    for k, (hz, mode_db, t60) in enumerate(modes):
        mode = ring(spikes(times, from_db(level_db + mode_db + scatter[:, k])), hz, t60)
        out = out + bandpass(mode, hz - swell_band_hz / 2, hz + swell_band_hz / 2)
    return np.array([out, np.roll(out, lag_samples)]) * from_db([[left_db / 2], [-left_db / 2]])


def noise_bands(low_hz, spectrum, envelope):
    """A continuous spectrum as a sum of third-octave noise bands, each modulated by envelope(hz)."""
    edges = low_hz * 2 ** (np.arange(40) / 3)
    edges = edges[edges < 19000]
    centres = np.sqrt(edges[1:] * edges[:-1])
    gains = from_db(at_hz(spectrum, centres))
    gains = gains / np.sqrt(np.sum(gains ** 2 * np.diff(edges) * 2 / SR))
    out, white = 0, rng.standard_normal((2, 2, N))
    for k, hz in enumerate(centres):
        band = bandpass(white[k % 2] * envelope(hz), edges[k], edges[k + 1], order=2)
        out = out + gains[k] * ports(band, hz)
    return out


def ports(pair, hz):
    """Partial coherence: the left port hears pair[0], the right hears it later, mixed with pair[1]."""
    coherence = [(60, 1), (150, 1), (300, 0.89), (600, 0.1), (1500, 0.28), (5000, 0.031), (12000, 0.11)]   # f/Hz, left-right correlation
    balance = [(60, -0.1), (200, -0.2), (350, -0.3), (700, 7), (1400, -0.5), (2800, 4), (5500, 10.5),
               (9000, 2), (14000, 3.5)]   # f/Hz, left over right/dB
    alike = np.clip(at_hz(coherence, hz), 0, 1)
    right = alike * np.roll(pair[0], int(at_hz(RIGHT_LAG, hz))) + np.sqrt(1 - alike ** 2) * pair[1]
    return np.array([pair[0], right]) * from_db(at_hz(balance, hz) / 2 * np.array([[1], [-1]]))


def ring(force, hz, t60):
    """Damped resonator: a unit impulse starts a decaying sine of amplitude 1."""
    r, w = decay(t60), 2 * np.pi * hz / SR
    return signal.lfilter([0, np.sin(w)], [1, -2 * r * np.cos(w), r * r], force)


def decay(t60):
    """Exponential decay: the amplitude ratio per sample that loses 60 dB in t60 seconds."""
    return from_db(-60 / (t60 * SR))


def bandpass(x, low_hz, high_hz, order=1):
    """Band limiting between two corner frequencies."""
    return signal.sosfilt(signal.butter(order, [low_hz, high_hz], "band", fs=SR, output="sos"), x)


def spikes(times, heights):
    """Impulse train with clicks at the given t/s."""
    out = np.full(N, 1e-18)
    np.add.at(out, np.minimum(np.round(np.asarray(times) * SR).astype(int), N - 1), heights)
    return out


def drift(corner_hz):
    """Slow random fluctuation of rms 1: low-passed noise, drawn every 40th sample."""
    r = np.exp(-80 * np.pi * corner_hz / SR)
    slow = signal.lfilter([1], [1, -2 * r, r * r], rng.standard_normal(N // 40 + 2002))[2000:]
    return np.interp(np.arange(N) / 40, np.arange(len(slow)), unit_rms(slow))


def in_time(rows):
    """Linear interpolation of each column against t/s, sample by sample."""
    times, *columns = np.transpose(rows)
    return [np.interp(np.arange(N) / SR, times, c) for c in columns]


def at_hz(points, hz):
    """Interpolation on a logarithmic frequency axis."""
    hz_points, values = np.transpose(points)
    return np.interp(np.log(hz), np.log(np.maximum(hz_points, 1)), values)


def from_db(db):
    """Level/dB to amplitude ratio."""
    return 10 ** (np.asarray(db) / 20)


def unit_rms(x):
    """Normalisation to rms 1."""
    return x / np.sqrt(np.mean(x ** 2) + 1e-20)


def scene():
    """Superposition of head, cabinet and workshop at the two microphone ports."""
    boom_db, panel_db, rattle_db = excitation()
    impacts = knocks()
    head = clatter(impacts, rattle_db) + head_rings(impacts, rattle_db) + jingle(rattle_db)
    parts = hook() + small_parts()
    cabinet = cabinet_boom(boom_db) + panel_drumming(panel_db) + panel_knocks()
    return head + parts + cabinet + workshop_air() + motor_hum() + hollow_taps()


def record(dry):
    """The microphone's finite bandwidth: the deepest bass is lost and the top is cut steeply."""
    low_hz, high_hz = 40, 15350
    dry = signal.sosfilt(signal.butter(4, low_hz, "high", fs=SR, output="sos"), dry)
    return signal.sosfilt(signal.ellip(10, .5, 70, high_hz, fs=SR, output="sos"), dry)


dry = scene()
out = record(dry)
inscribe(out)
```